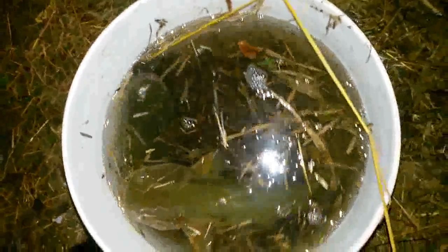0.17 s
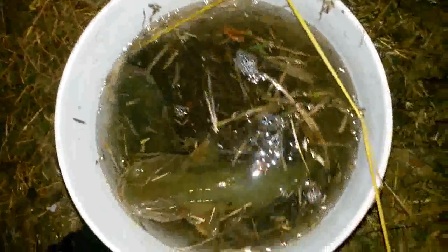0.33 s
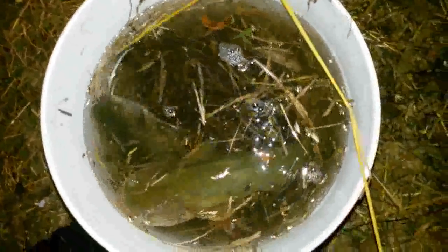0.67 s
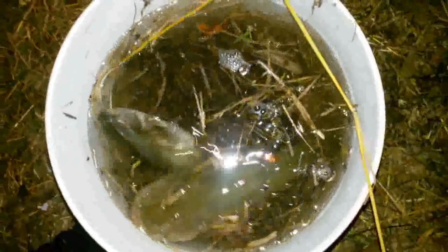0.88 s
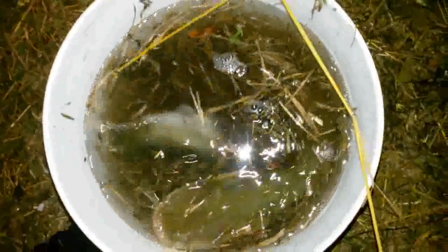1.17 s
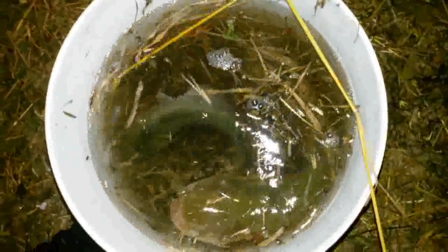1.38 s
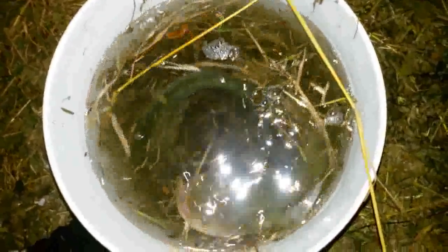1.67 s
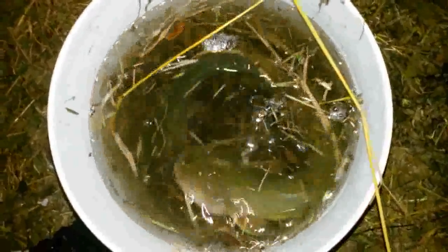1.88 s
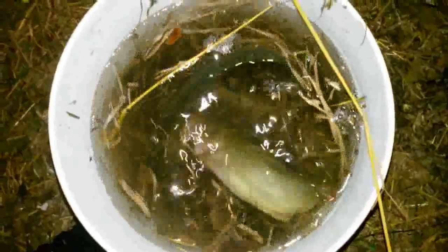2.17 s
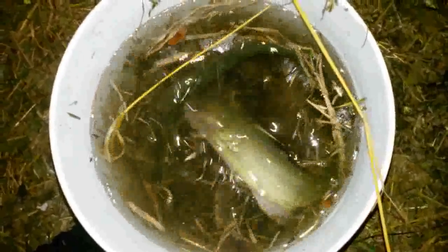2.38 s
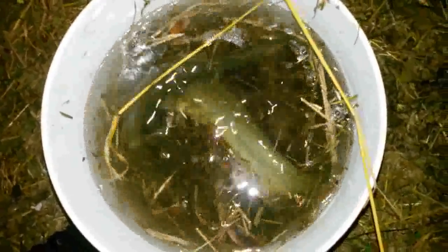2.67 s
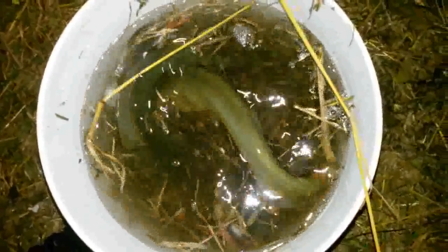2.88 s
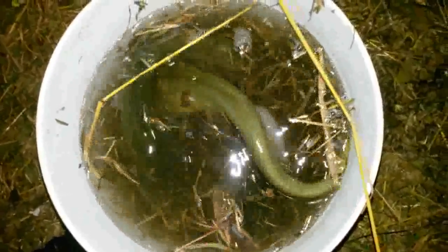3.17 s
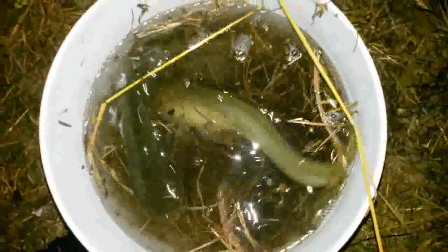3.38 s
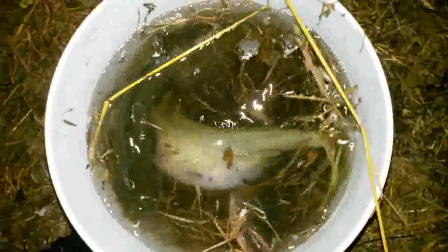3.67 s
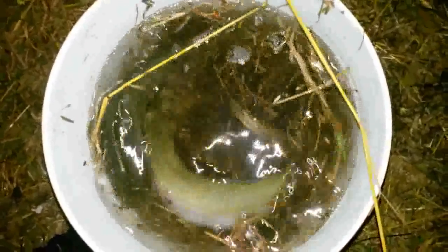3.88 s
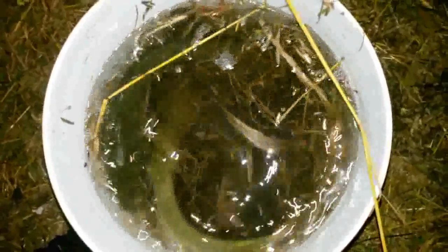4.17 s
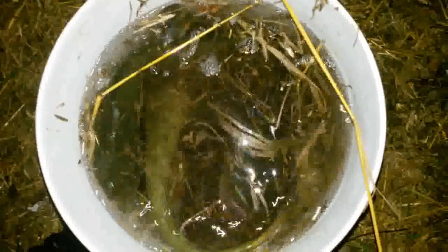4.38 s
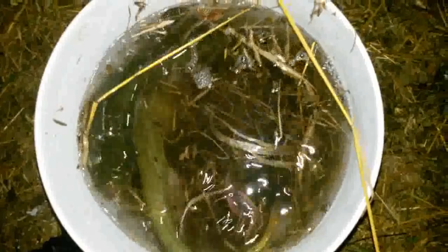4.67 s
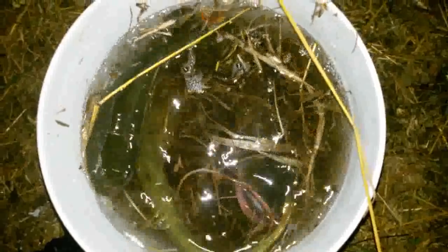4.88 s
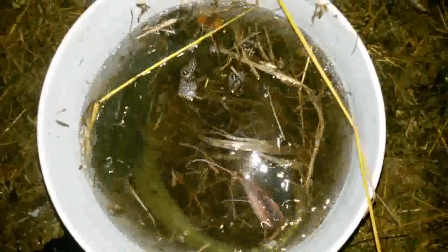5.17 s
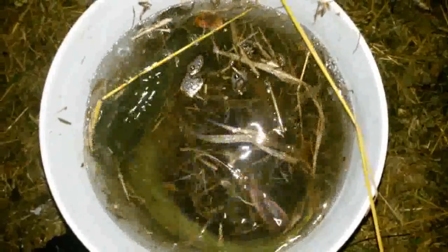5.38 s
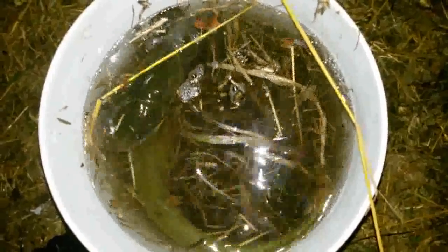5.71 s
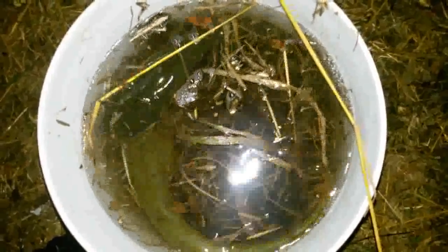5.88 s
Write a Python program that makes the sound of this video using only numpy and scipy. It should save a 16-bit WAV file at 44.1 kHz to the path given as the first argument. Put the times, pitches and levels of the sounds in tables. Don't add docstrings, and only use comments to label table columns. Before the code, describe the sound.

Low far-off road rumble with faint engine drones and a smooth watery hiss outdoors, plus a single sharp dry click.

```python
import sys
import numpy as np
from scipy import signal
from scipy.fft import rfft, irfft, next_fast_len
from scipy.io import wavfile
from scipy.ndimage import uniform_filter1d

SR = 44100
rng = np.random.default_rng(int(sys.argv[2]) if len(sys.argv) > 2 else 0)


def generate_wav(signal):
    frames = np.transpose(np.atleast_2d(signal))
    scaled = np.clip(frames, -1, 1) * 32767
    pcm = np.round(scaled).astype(np.int16)
    wavfile.write(sys.argv[1], SR, pcm)


def boost(x):
    u = np.asarray(x, float) / 20
    return 10 ** u


N = 266496


def clock():
    return np.arange(N) / SR


def curve(table):
    at_s, value = np.transpose(table)
    return np.interp(clock(), at_s, value)


def rise(at_s, rise_s):
    return (1 + np.tanh((clock() - at_s) / rise_s)) / 2


def bell(at_s, half_s):
    return np.exp(-((clock() - at_s) / half_s) ** 2)


def glimpses(base_db, moments, half_s):
    return boost(base_db) + sum(boost(db) * bell(at_s, half_s) for at_s, db in moments)


def unit(x):
    return x / np.sqrt(np.mean(x ** 2))


def walk(rate_hz):
    hold = int(SR / rate_hz)
    steps = np.repeat(rng.standard_normal(N // hold + 1), hold)
    return unit(uniform_filter1d(uniform_filter1d(steps, hold), hold)[:N])


def crowd(colour, swell_db, swell_hz):
    size = next_fast_len(N)
    octave = np.log2(np.maximum(np.fft.rfftfreq(size, 1 / SR), 1))
    hz, db = np.transpose(colour)
    gain = boost(np.interp(octave, np.log2(hz), db, left=-120, right=-120))
    noise = rfft(rng.standard_normal(size)) * gain
    out = np.zeros(N)
    for centre in np.arange(np.floor(np.log2(hz[0])), np.log2(hz[-1]) + 0.5, 0.5):
        share = np.clip(1 - 2 * np.abs(octave - centre), 0, 1)
        out += irfft(noise * share, size)[:N] * boost(swell_db * walk(swell_hz))
    return unit(out)


def crank(hz, wobble):
    return np.cumsum(hz * (1 + wobble * walk(5))) / SR


def order(turns, multiple, shimmer_db):
    start = rng.uniform()
    tone = np.sqrt(2) * np.sin(2 * np.pi * (multiple * turns + start))
    return tone * boost(shimmer_db * walk(3.9))


def exhausts(near_db):
    # frequency in Hz, density in dB per Hz.
    exhaust_colour = [(8, -21), (22, -10), (33, -14), (42, -13.5), (50, -3), (70, 1), (130, -0.5),
                      (230, -2.5), (300, -10), (450, -21.5), (800, -39)]
    return boost(-35.5 + 0.5 * near_db) * crowd(exhaust_colour, 0.85, 2.48)


def nearer_vehicles(near_db):
    # frequency in Hz, density in dB per Hz.
    nearer_colour = [(150, -36.5), (260, 2), (400, -0.5), (620, 1.5), (850, -11), (1400, -27.5)]
    return boost(-43 + 1.01 * near_db) * crowd(nearer_colour, 0.77, 2.7)


def tyres(near_db):
    # frequency in Hz, density in dB per Hz.
    tyre_colour = [(500, -15.5), (800, -9.5), (1100, 0.5), (1300, -0.5), (1450, -1.5), (1650, -2),
                   (2000, -6.5), (2400, -9.5), (2900, -14.5), (4500, -27), (9000, -51)]
    return boost(-36.5 + 0.03 * near_db) * crowd(tyre_colour, 0.48, 2.9)


def tread(near_db):
    # frequency in Hz, density in dB per Hz.
    tread_colour = [(450, -25.5), (650, -7), (800, -2), (930, 0.5), (1050, -3.5), (1300, -21)]
    # time in seconds, level in dB.
    cars = [
        (0, -50),
        (2.0, -48),
        (3.4, -50),
        (4.9, -53.5),
    ]
    return glimpses(-39 + 0.35 * near_db, cars, half_s=0.27) * crowd(tread_colour, 0.46, 3.53)


def road():
    # time in seconds, nearness in dB.
    wave = [
        (0, 0),
        (.6, 0),
        (1.7, 2.5),
        (2.9, 3),
        (3.45, 4),
        (3.9, 3),
        (5.0, 3),
        (5.6, 0.5),
        (6.04, 0.5),
    ]
    near_db = curve(wave)
    return exhausts(near_db) + nearer_vehicles(near_db) + tyres(near_db) + tread(near_db)


def cruiser():
    # order multiple, level in dB between swells.
    cruiser_orders = [(1, -50), (2, -49), (3, -52)]
    # time in seconds, order
    # multiple, level in dB.
    cruiser_swells = [(0, 1, -48), (.7, 1, -38), (1.15, 1, -43.5), (1.6, 1, -36.5), (2.15, 1, -44),
                      (2.45, 1, -43.5), (.4, 2, -49.5), (.95, 2, -41), (1.9, 2, -38.5), (2.75, 2, -45),
                      (3.2, 2, -44.5), (0, 3, -50), (.35, 3, -51.5), (.7, 3, -48.5), (1.25, 3, -52),
                      (2.45, 3, -47), (3.0, 3, -47)]
    cruise_hz, throttle_gain_hz, creep_hz_per_s = 79.14, 1.0, 0.055
    throttle_s, lift_s = 0.888, 3.47
    firing_hz = cruise_hz + throttle_gain_hz * rise(throttle_s, 0.18)
    firing_hz = firing_hz + creep_hz_per_s * np.maximum(clock() - throttle_s, 0)
    turns = crank(firing_hz, 0.0015)
    out = np.zeros(N)
    for multiple, screened_db in cruiser_orders:
        moments = [(at_s, db) for at_s, m, db in cruiser_swells if round(m) == round(multiple)]
        out += glimpses(screened_db, moments, half_s=0.16) * order(turns, round(multiple), 0.92)
    lift = np.clip((lift_s - clock()) / 0.27, 0, 1)
    return boost(1.0) * lift * out


def hauler():
    # crank multiple, level in dB.
    hauler_orders = [(3, -6.5), (6, -1), (7, 1.5), (9, -14.5)]
    # time in seconds, level in dB.
    hauler_gaps = [
        (4.15, -43.5),
        (5.5, -53.5),
    ]
    crank_hz, climb_sag_hz = 31.53, 0.75
    turns = crank(crank_hz - climb_sag_hz * bell(at_s=4.55, half_s=0.596), 0.0042)
    gain = rise(at_s=3.55, rise_s=0.33) * glimpses(-46.5, hauler_gaps, half_s=0.28)
    return gain * sum(boost(db) * order(turns, multiple, 1.4) for multiple, db in hauler_orders)


def bus():
    # time in seconds, firing rate in Hz.
    bus_speed = [
        (0, 67.4),
        (2.0, 60.5),
        (3.3, 63),
        (3.7, 66),
        (5.1, 65),
        (6.04, 63),
    ]
    # time in seconds, level in dB.
    bus_gaps = [
        (0, -53),
        (2.0, -52),
        (3.7, -45),
        (4.6, -44),
        (5.35, -46),
        (5.8, -42),
    ]
    return glimpses(-52.5, bus_gaps, half_s=0.19) * order(crank(curve(bus_speed), 0.0066), 1.0, 1.1)


def hum():
    # nominal frequency in Hz (the line sounds at 0.97 of it), level in dB rms.
    hum_lines = [(52, -50.5), (104, -58.5)]
    return sum(boost(db) * order(crank(hz, 0.0081), 0.97, 4.3) for hz, db in hum_lines)


def river():
    # frequency in Hz, density in dB per Hz (both colours).
    flow_colour = [(1800, -9.5), (2900, -5), (3600, 0), (4200, -4), (5100, -4.5), (6000, -12), (7200, -21),
                   (9000, -36)]
    spray_colour = [(4500, -17), (6200, 1), (7400, -2.5), (8600, -9.5), (10200, -13), (13000, -29)]
    # time in seconds, change of flow hiss in dB.
    breeze = [
        (0, -0.5),
        (.35, 0.5),
        (.8, -1),
        (1.7, -0.5),
        (2.2, -3),
        (2.9, -4.5),
        (3.5, -2.5),
        (4.9, -1.5),
        (6.04, 0.5),
    ]
    # time in seconds, level in dB.
    riffles = [
        (1.68, -72),
        (2.65, -72.5),
        (5.5, -78),
    ]
    lull_db = curve(breeze)
    flow = boost(-46.3 + lull_db) * crowd(flow_colour, 0.92, 6.5)
    spray_gain = boost(-0.36 * lull_db) * glimpses(-64.5, riffles, half_s=0.3)
    return flow + spray_gain * crowd(spray_colour, 0.8, 4.5)


def snap():
    # time in seconds, peak level in dB.
    snaps = [
        (.9146, -21.5),
    ]
    # mode frequency in Hz, level in dB.
    stalk_modes = [(5150, 0), (7800, -22), (10500, -21), (13500, -15)]
    crack_s = 0.0011
    t = np.arange(600) / SR
    swell = np.sin(np.pi * np.clip(t / crack_s, 0, 1))
    ring = swell * sum(boost(db) * np.sin(2 * np.pi * hz * t) for hz, db in stalk_modes)
    high_pass = signal.butter(2, 4500, "high", fs=SR, output="sos")
    tail = signal.sosfilt(high_pass, rng.standard_normal(len(t))) * np.exp(-t / 0.0037)
    crack = ring / np.abs(ring).max() + boost(-30) * tail
    out = np.zeros(N)
    for at_s, db in snaps:
        first = int(at_s * SR)
        out[first:first + len(t)] += boost(db) * crack
    return out


def capsule():
    return boost(-59.5) * rng.standard_normal(N)


def scene():
    return (road() + cruiser() + hauler() + bus() + hum() + river() + snap())[None]


def band_limit(x):
    return signal.sosfilt(signal.butter(12, 14980, fs=SR, output="sos"), x)


def record(dry):
    mix = dry[0] + capsule()
    return band_limit(mix)


dry = scene()
out = record(dry)
generate_wav(out)
```